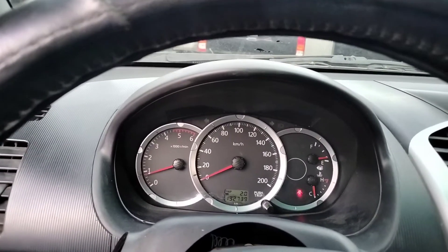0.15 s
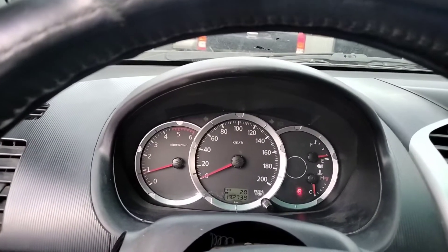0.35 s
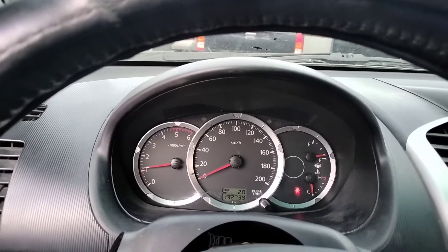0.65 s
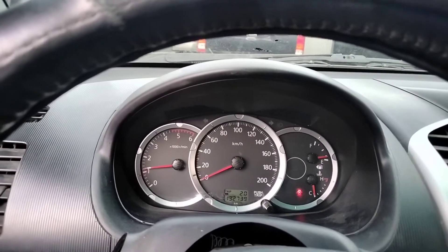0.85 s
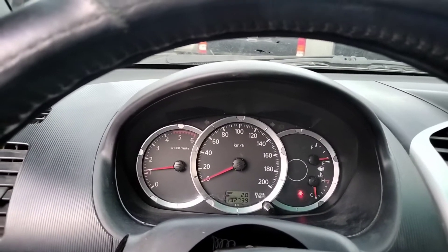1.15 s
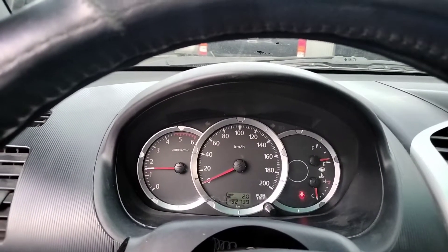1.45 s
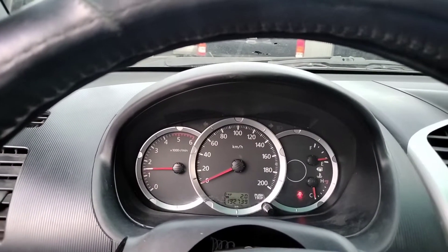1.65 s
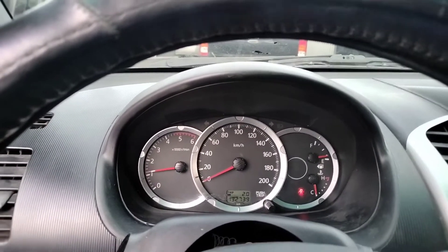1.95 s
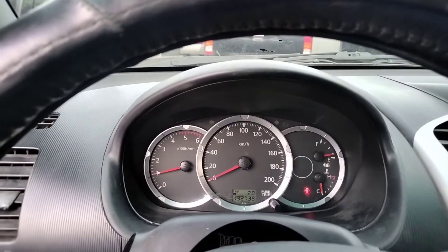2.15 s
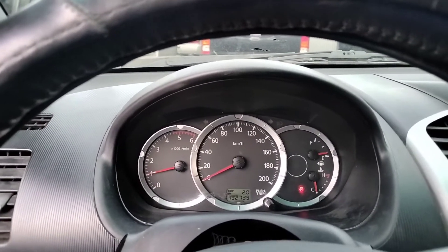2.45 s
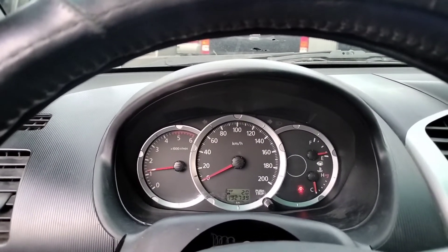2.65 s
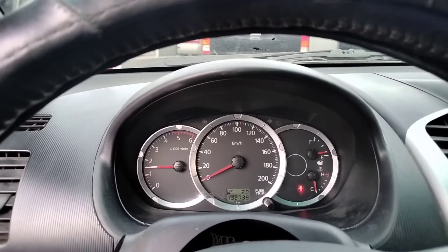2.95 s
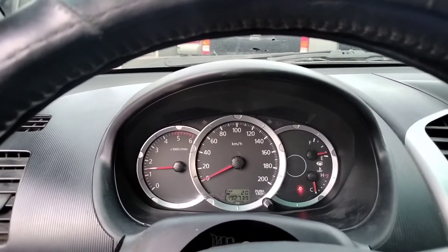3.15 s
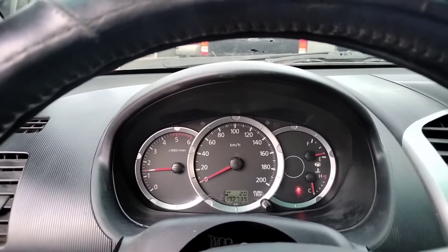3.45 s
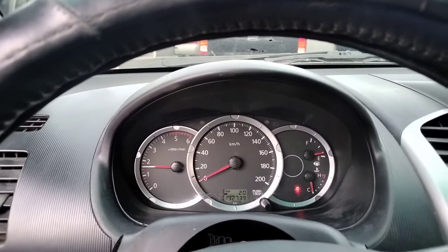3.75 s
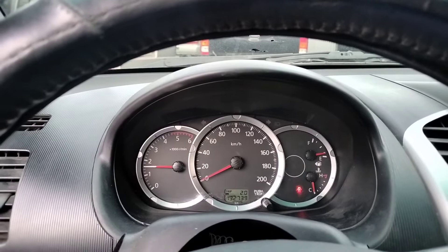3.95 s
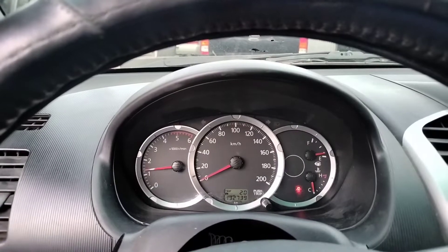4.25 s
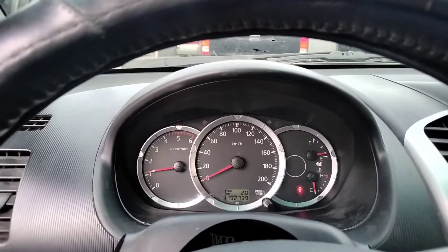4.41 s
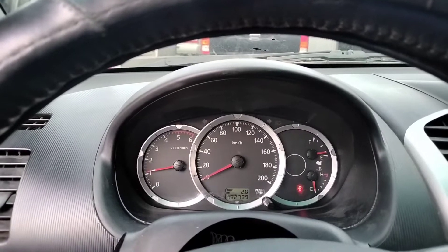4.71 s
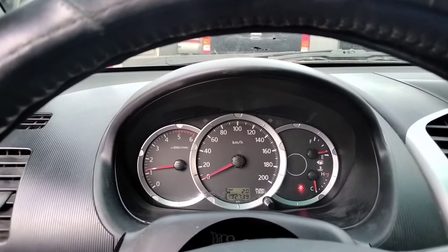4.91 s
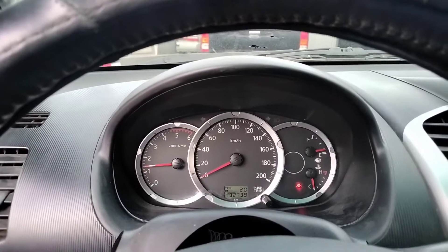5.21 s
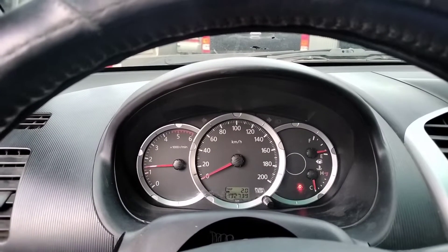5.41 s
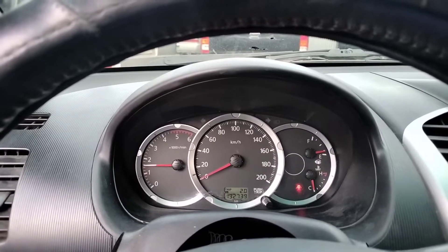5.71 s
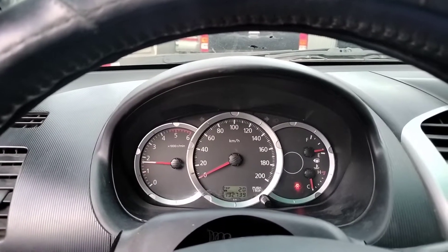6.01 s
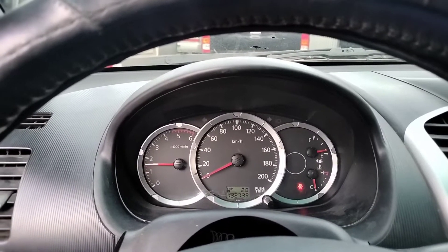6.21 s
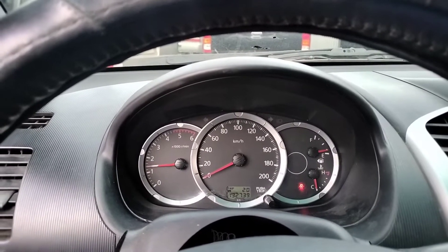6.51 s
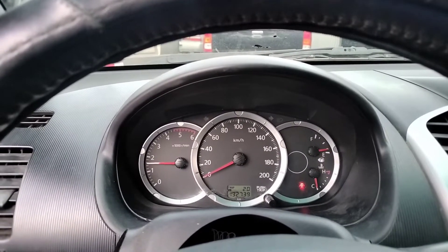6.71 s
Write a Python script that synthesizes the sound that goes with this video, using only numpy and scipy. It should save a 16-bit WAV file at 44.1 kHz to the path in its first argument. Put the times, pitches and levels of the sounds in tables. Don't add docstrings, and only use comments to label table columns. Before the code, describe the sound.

Inside a parked pickup cab, a four-cylinder diesel throbs and clatters as it is revved in short blips, growling up and sinking back.

```python
import sys
import numpy as np
from scipy import signal
from scipy.fft import rfft, irfft
from scipy.io import wavfile
from scipy.ndimage import uniform_filter1d

SR = 44100
rng = np.random.default_rng(int(sys.argv[2]) if len(sys.argv) > 2 else 0)


def inscribe(sig):
    pcm = np.round(np.clip(np.atleast_2d(sig).T, -1, 1) * 32767)
    wavfile.write(sys.argv[1], SR, pcm.astype(np.int16))


def boost_factor(decibels):
    exponent = np.asarray(decibels, float) / 20
    return 10 ** exponent


N = 302967
HZ = np.fft.rfftfreq(N, 1 / SR)
T = np.arange(N) / SR


def unit(x):
    return x / np.sqrt(np.mean(x ** 2))


def across(table):
    hz, value = np.transpose(table)
    return np.interp(np.log(HZ + 1), np.log(hz), value)


def colour(x, table):
    # centre in Hz, width in Hz, lift in dB.
    resonances = [(327, 25, 3), (738, 38, 7.5), (1730, 60, 3), (2225, 70, 3), (3300, 100, 3), (3790, 80, 3),
                  (5490, 140, 2), (6040, 60, 3)]
    lift_db = sum(db / (1 + ((HZ - hz) / (width / 2)) ** 2) for hz, width, db in resonances)
    return irfft(rfft(x) * boost_factor(across(table) + lift_db), N)


def walk(rate):
    hold = int(SR / rate)
    steps = np.repeat(rng.standard_normal(N // hold + 1), hold)
    return unit(uniform_filter1d(uniform_filter1d(steps, hold), hold)[:N])


def hiss():
    return rng.standard_normal((3, N))


def follow(law, hz, effort_db):
    middle_hz = 45
    db, per_hz, per_effort, per_rise = law
    return db + per_hz * (hz - middle_hz) + per_effort * effort_db + per_rise * SR * np.gradient(hz)


def peak(hz, centre_hz, width_hz):
    return 1 / np.sqrt(1 + (2 * (hz - centre_hz) / width_hz) ** 2)


def engine_speed():
    # time in seconds, firing rate in Hz.
    blips = [(0.0, 25.17), (0.32, 27.52), (0.6, 47.12), (1.05, 36.36), (1.42, 56.04), (1.85, 37.46),
             (2.25, 28.08), (2.7, 51.82), (2.88, 54.93), (3.3, 42.06), (3.77, 57.66), (4.2, 39.49),
             (4.62, 34.53), (5.05, 46.62), (5.4, 46.75), (5.98, 59.16), (6.4, 41.06), (6.87, 63.97)]
    flywheel = int(0.16 * SR)
    return uniform_filter1d(uniform_filter1d(np.interp(T, *np.transpose(blips)), flywheel), flywheel // 2)


def pedal_effort():
    # time in seconds, effort in dB below full.
    fuelling = [(0.05, -11), (0.53, -2), (0.8, -9), (1.05, -4), (1.28, -0.5), (2.03, -13.5), (2.24, -5.5),
                (2.5, -2.5), (2.76, -1.5), (3.05, -7.5), (3.5, -1), (3.8, -4), (4.25, -10), (4.8, -3),
                (5.85, -3), (6.27, -6.5), (6.56, -2), (6.87, -3)]
    return np.interp(T, *np.transpose(fuelling))


def firing_strengths(turns):
    cylinders_db = [-4.5, -5, -6, -6]
    firing = turns.astype(int)
    return boost_factor(np.array(cylinders_db)[firing % 4] + 2.46 * rng.standard_normal(N // 500)[firing])


def throb(turns, hz, effort_db, rumble_db):
    # resonance in Hz, width in Hz, throb there in dB.
    mounts = (48, 43, -26.5)
    # dB at middle speed and full effort, dB per Hz, dB per dB of effort, dB per Hz/s.
    octave_law = (-30, .1, .3, .01)
    # multiple of the firing rate, level in dB above the body rumble.
    upper_orders = [(1.5, -12), (3, -9), (3.5, -9), (4, -10), (4.5, -14), (6, -17)]
    soak_db = -1.87 * np.clip(hz - 50.4, 0, None)
    first_db = mounts[2] + 20 * np.log10(peak(hz, *mounts[:2])) + soak_db + 2.0 * walk(7.3)
    octave_db = follow(octave_law, hz, effort_db) + 2.2 * walk(8)
    first = boost_factor(first_db + 1.3 * walk(16)) * np.sin(2 * np.pi * turns + 0.25 * walk(12))
    octave = boost_factor(octave_db + 2 * walk(14)) * np.sin(4 * np.pi * turns + 0.4 * walk(12))
    upper = sum(boost_factor(db + 3.4 * walk(7)) * np.sin(2 * np.pi * k * turns + 0.51 * walk(9.8))
                for k, db in upper_orders)
    return np.sqrt(2) * (first + octave + boost_factor(rumble_db) * upper)


def body(turns, strength, rumble_db):
    # frequency in Hz, density in dB per Hz.
    floor_colour = [(12, -41), (25, -6.5), (45, -11), (65, -4), (100, -1), (140, -9.5), (175, -4),
                    (215, -3), (330, -7.5), (500, -9.5), (650, -14.5), (900, -24), (1300, -57)]
    thuds = strength * np.diff(np.floor(turns), prepend=0)
    shake = hiss() * (2.5 + strength * np.sin(np.pi * (turns % 1) ** 0.6))
    return boost_factor(rumble_db + 3.0) * unit(colour(unit(shake) + 0.2 * unit(thuds), floor_colour))


def boom(hz, effort_db):
    # frequency in Hz, level in dB.
    cab_air = [(105, -52.5), (120, -30.5), (128, -21), (137, -15.5), (150, -14.5), (165, -21.5)]
    # multiple of the firing rate, level in dB.
    orders = [(2.66, 0.63), (2.5, -13.5), (3, -12), (3.5, -15), (5, -17.5)]
    late_hz = np.interp(T - 0.035, T, hz)
    turns = np.cumsum(late_hz) / SR
    lines = 0
    for k, db in orders:
        cab_db = np.interp(k * late_hz, *np.transpose(cab_air))
        dropout_db = -4.7 * walk(20) ** 2
        lines = lines + boost_factor(db + cab_db + dropout_db) * np.sin(2 * np.pi * k * turns + 0.3 * walk(14))
    return boost_factor(5.0 + 0.3 * effort_db) * lines


def clatter(turns, strength, hz, effort_db):
    # frequency in Hz, density in dB per Hz.
    block_colour = [(470, -11.5), (800, 0), (843, -3), (1320, -2), (1700, -5), (2290, -9), (3010, -13.5),
                    (3270, -14.5), (3790, -13), (4700, -20), (6110, -59), (10300, -120)]
    jet_colour = [(2590, -28.5), (4400, -4.5), (5130, -0.5), (5520, -0.5), (6100, -2.5), (7030, -0.5),
                  (8460, -18.5), (10800, -15.5), (14800, -21), (15500, -25)]
    # dB at middle speed and full effort, dB per Hz, dB per dB of effort, dB per Hz/s.
    rattle_law = (-32, 0.1636, 1.0464, 0.0252)
    sizzle_law = (-44.5, 0.03, 1.8, 0.0047)
    gate = 1.7 + strength * np.sin(np.pi * (turns % 1) ** 0.4) ** 3
    rattle_db = follow(rattle_law, hz, effort_db) + 5.0 + 0.51 * walk(11)
    rattle = boost_factor(rattle_db) * unit(colour(hiss() * gate, block_colour))
    sizzle_level = np.hypot(boost_factor(follow(sizzle_law, hz, effort_db) + 5.3), boost_factor(-56))
    sizzle = sizzle_level * boost_factor(0.59 * walk(11)) * unit(colour(hiss() * gate, jet_colour))
    return rattle + sizzle


def knocks():
    # time in seconds, peak in dB, brightness in dB.
    strikes = [(0.3002, -29, -23), (0.527, -20, -18), (0.585, -27, -18), (0.984, -33.5, -8),
               (1.1117, -33.5, -8), (1.258, -27, -19), (2.154, -30.5, -7), (2.4021, -36, -13),
               (2.4894, -26.5, -17), (2.699, -28, -9.5), (3.2176, -24, -16), (3.312, -18.5, -11.5),
               (3.3973, -22, -9), (3.485, -26, -11), (3.569, -31.5, -5), (4.4094, -34, -9.5),
               (4.633, -24, -15), (4.831, -18, -14.5), (4.922, -20.5, -13), (5.018, -23.5, -18),
               (5.3494, -33.5, -18), (5.427, -25, -19), (5.511, -22.5, -13), (5.5918, -26.5, -10.5),
               (5.669, -27, -9.5), (5.743, -23.5, -17), (6.434, -19, -17.5), (6.5254, -21.5, -19.5),
               (6.7006, -29, -25), (6.7666, -33.5, -15)]
    # frequency in Hz, density in dB per Hz.
    rap_colour = [(530, -40.5), (900, -1), (1900, -2.5), (2560, -6), (3290, -5), (3840, -5.5),
                  (4480, -21.5), (4800, -29.5), (6240, -48), (10600, -120)]
    ping_colour = [(2820, -42), (4800, -11), (5920, 5), (7130, -1), (8110, -17.5), (9910, -16),
                   (11900, -15.5), (12900, -20.5), (15000, -19)]
    early_s, rise_s, hold_s, tail_s, burn_s = 0.004, 0.0046, 0.031, 0.022, 0.052
    low, high = np.zeros((2, N))
    for s, db, bright_db in strikes:
        t = T - s + early_s
        decay = np.exp(-np.clip(t - hold_s, 0, 1) / tail_s - np.clip(t, 0, 1) / burn_s)
        shape = np.clip(t / rise_s, 0, 1) * decay
        low += boost_factor(2 * db) * shape ** 2
        high += boost_factor(2 * (db + bright_db)) * shape ** 2
    rap = boost_factor(-4.0) * np.sqrt(low) * unit(colour(hiss(), rap_colour))
    ping = boost_factor(-3.5) * np.sqrt(high) * unit(colour(hiss(), ping_colour))
    return rap + ping


def gear_whine(turns, hz, effort_db):
    # dB at middle speed and full effort, dB per Hz, dB per dB of effort, dB per Hz/s.
    whine_law = (-48, .3, .1, -.03)
    order = 44.1
    casing = peak(order * hz, 2100, 700)
    level = boost_factor(follow(whine_law, hz, effort_db) + 3 * walk(8))
    return casing * level * np.sin(2 * np.pi * order * turns + 1.5 * walk(70))


def turbo():
    start_s, length_s, fade_s = 6.07, 0.17, 0.04
    since = np.clip(T - start_s, 0, length_s)
    hz = 7020 - 1600 * since
    level = boost_factor(-56 + 6 * since / length_s + 6.0 * walk(40))
    fade = np.clip(np.minimum(T - start_s, start_s + length_s - T) / fade_s + 1, 0, 1) ** 2
    return np.sqrt(2) * fade * level * np.sin(2 * np.pi * np.cumsum(hz) / SR)


def floor_pan():
    # frequency in Hz, density in dB per Hz.
    pan_colour = [(40, -43.5), (70, 7.5), (90, 17), (115, 7), (150, 9), (250, -42)]
    return boost_factor(-35.5 + 3.4 * walk(7.5)) * unit(colour(hiss(), pan_colour))


def ports(shared, left, right):
    # frequency in Hz, share from 0 to 1.
    common_share = [(60, 1.5), (150, 1.5), (220, 1.01), (400, 0.9), (640, 0.66), (1400, 0.66), (2400, 0.15),
                    (3500, 0.01), (15000, 0.44)]
    # frequency in Hz, left minus right in dB.
    balance = [(60, -.3), (150, -.2), (380, .6), (700, .5), (1290, 2), (2380, 3.2), (4400, .6), (8120, -.7),
               (15000, 0)]
    alike = np.clip(across(common_share), 0, 1)
    early = np.exp(2j * np.pi * HZ * 15.87 / SR)
    lean = boost_factor(across(balance) / 2)
    common = np.sqrt(alike) * rfft(shared)
    own = np.sqrt(1 - alike)
    left_port = lean * (early * common + own * rfft(left))
    right_port = (common + own * rfft(right)) / lean
    return irfft([left_port, right_port], N)


def thin_bands(pair, size=2048, count=6):
    # frequency in Hz, share from 0 to 1.
    emptied = [(800, 0), (1000, .2), (1400, .32), (1700, .1), (2500, .12), (3200, .3), (5000, .4),
               (7300, .45), (8200, .66), (15400, .56), (15500, 1)]
    mix = np.array([[1, 1], [1, -1]]) / np.sqrt(2)
    hz, _, z = signal.stft(mix @ pair, SR, "cosine", size)
    power = np.log(uniform_filter1d(abs(z) ** 2, size=count, axis=1) + 1e-14)
    around = uniform_filter1d(uniform_filter1d(power, size=40, axis=1), size=9, axis=2)
    standing = power - around
    chance = uniform_filter1d(rng.standard_normal((2, len(hz) // count + 1, z.shape[2])), size=3)
    bass = power[0, count]
    chance = chance - 0.25 * np.outer(hz[::count] < 2000, unit(bass - bass.mean()))
    chance = unit(chance + 0.7 * standing[:, ::count])
    chance = np.repeat(chance, count, axis=1)[:, :len(hz)]
    edge_hz, edge_share = np.transpose(emptied)
    share = np.interp(np.log(hz + 1), np.log(edge_hz), edge_share)
    rank = (1 + np.tanh(0.85 * chance)) / 2
    return mix @ signal.istft(z * (rank > share[:, None]), SR, "cosine", size)[1][:, :N]


def scene():
    # dB at middle speed and full effort, dB per Hz, dB per dB of effort, dB per Hz/s.
    rumble_law = (-28.5, 0.31, 0.67, -0.0188)
    hz = engine_speed()
    effort_db = pedal_effort()
    turns = np.cumsum(hz) / SR
    strength = firing_strengths(turns)
    rumble_db = follow(rumble_law, hz, effort_db)
    engine = body(turns, strength, rumble_db)
    engine[0] += throb(turns, hz, effort_db, rumble_db)
    engine += clatter(turns, strength, hz, effort_db)
    engine += knocks()
    engine += gear_whine(turns, hz, effort_db)
    engine += floor_pan()
    return ports(*engine) + boom(hz, effort_db) + turbo()


def roll_off(x):
    return signal.sosfilt(signal.butter(12, 15810, fs=SR, output="sos"), x)


def record(dry):
    thinned = thin_bands(dry)
    return roll_off(thinned)


dry = scene()
out = record(dry)
inscribe(out)
```